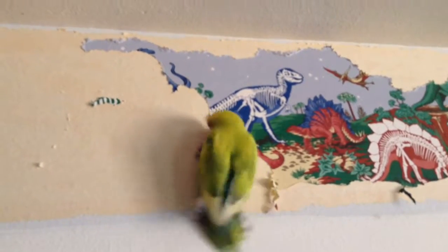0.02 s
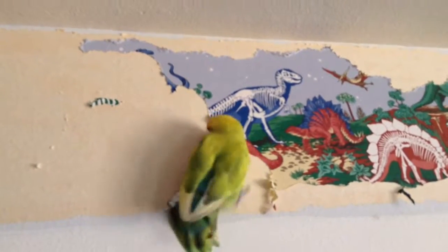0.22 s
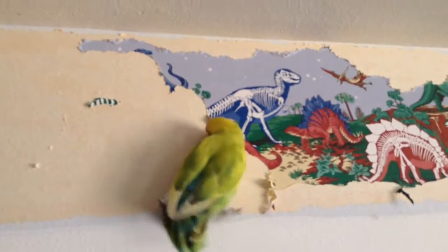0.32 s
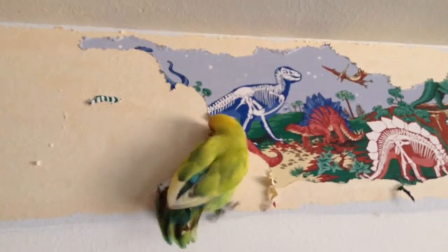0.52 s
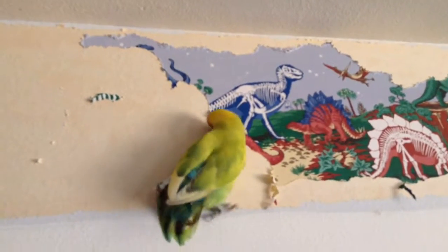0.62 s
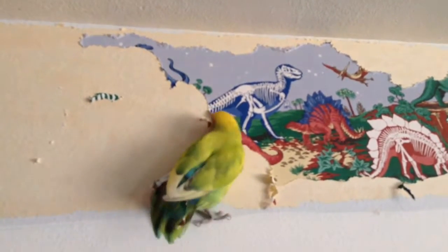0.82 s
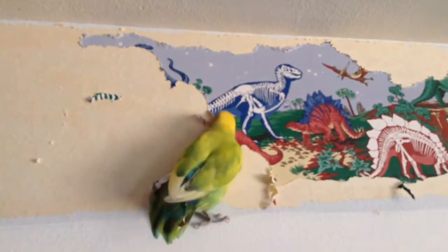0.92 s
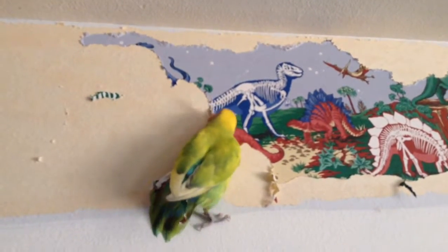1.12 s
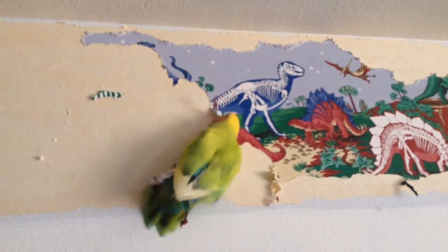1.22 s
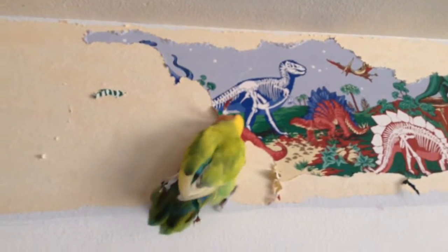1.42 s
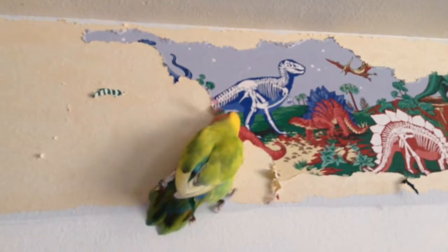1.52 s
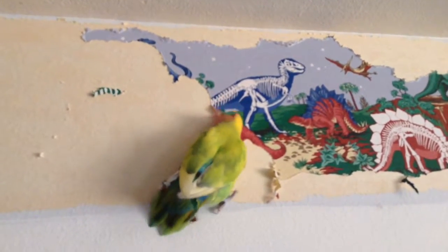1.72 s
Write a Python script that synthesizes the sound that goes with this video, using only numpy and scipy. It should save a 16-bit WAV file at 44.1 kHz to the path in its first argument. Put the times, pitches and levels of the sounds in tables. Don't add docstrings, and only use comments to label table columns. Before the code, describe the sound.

A small parrot chatters a rapid string of shrill, raspy chirps, then flutters its wings softly indoors.

```python
import sys
import numpy as np
from scipy import signal
from scipy.fft import rfft, irfft
from scipy.io import wavfile
from scipy.ndimage import uniform_filter1d, minimum_filter1d

SR = 44100
rng = np.random.default_rng(int(sys.argv[2]) if len(sys.argv) > 2 else 0)


def master(y):
    cut = np.clip(np.atleast_2d(y).T, -1, 1)
    pcm = np.round(cut * 32767)
    wavfile.write(sys.argv[1], SR, pcm.astype(np.int16))


def natural_amplitude(level_db):
    exponent = np.asarray(level_db, float) / 20
    return 10 ** exponent


N = 79380
LEAD = 8820

# frequency_hz, level_db per Hz
HOUSE_HISS = [(40, -27), (90, -7.5), (170, 5), (290, -14), (1000, -13.5), (3000, -10), (6000, -20),
              (15500, -23)]
RUMBLE_HZ = (122.6, 156.8)
RUMBLE_DB = (-65, -67)
# start_s, level_db, pitch_hz
BUMPS = [
    (0.741, -45, 249),
    (1.084, -53.5, 165.8),
    (1.226, -50.5, 221.6),
    (1.781, -51, 170),
]
# start_s, length_s, level_db
RUSTLES = [
    (1.171, 0.026, -62),
    (1.213, 0.0071, -51),
    (1.215, 0.056, -61),
]
# frequency_hz, level_db
PAPER = [(1200, -15), (2000, -8), (5000, -34), (7500, 8), (9500, 8), (11500, -6.5), (13700, 7),
         (15500, -13.5)]
# frequency_hz, level_db, t60_s
TICK_MODES = [(1726, 0, 0.006), (2800, -6.5, .004), (4140, -2, 0.005), (8050, -1, 0.005), (9350, -2, 0.004),
              (13030, -8, 0.004)]
# start_s, level_db, swish_db (against the puff)
BEATS = [(0.744, -53, 26), (0.808, -51, 10), (0.872, -51, -2), (0.928, -39.5, -21), (0.989, -56, -4),
         (1.05, -43, -14.5), (1.123, -42.5, -13), (1.183, -47.5, 1), (1.233, -44.5, -13),
         (1.291, -38.5, -14), (1.351, -44.5, -9), (1.409, -42.5, -10), (1.47, -37.5, -17),
         (1.529, -52, -4.5), (1.587, -48.5, -11.5), (1.649, -49.5, -5), (1.71, -50, -1), (1.773, -48, -5)]
# frequency_hz, level_db
SWISH = [(300, -10.5), (700, 4.5), (1200, 6), (2000, -2.5), (4000, -1), (5500, -11), (9000, -19)]

# start_s, pitch_hz, level_db, half_pitch_db (share), roughness (0-1)
EARLIER = [(-.09, 3312, -35.5, 22.5, 0.42), (-.05, 3141, -29, 3, 0.44), (-.02, 3185, -41.5, 13, 0.3)]
RISE = [(0.173, 2894, -36, -45, .1), (0.184, 2800, -27, -45, 0.081), (0.213, 3089, -26.5, -50, .05),
        (0.249, 3231, -17.5, -57, .04), (0.26, 3534, -16.5, -47, .1)]
RASP = [(.251, 3500, -30, -35, .1), (.257, 4150, -26, -30, .3), (.267, 4150, -24, -6, .4),
        (.292, 4150, -24, -6, .5), (.306, 4200, -27, -6, .5), (.311, 3745, -15, -14, .15),
        (.318, 3600, -24, -10, .4), (.328, 3410, -20, -12, .3), (.358, 3470, -27, -12, .3)]
PEEP = [(0.376, 3520, -33, 0.5, .6), (0.393, 4024, -24.5, -10.5, 0.49), (0.397, 4178, -15, -30, 0.14),
        (0.409, 4290, -15, -49.5, .06), (0.424, 4267, -13.5, -53.5, .05), (0.425, 4173, -26, -50, .05),
        (0.432, 4250, -13.5, -46.5, 0.41), (.446, 4220, -29, -39.5, 0.38), (.472, 4140, -18.5, -38, 0.46)]
LOW = [(0.43, 2950, -27, -45, 0.15), (.437, 2950, -29.5, -45, 0.15), (.441, 3330, -22, -45, 0.14),
       (.45, 3100, -22, -45, .14), (0.465, 3250, -22, -40, 0.3), (0.472, 2940, -16, -45, 0.1),
       (0.497, 2960, -16, -45, 0.1), (.51, 3020, -15, -45, .1), (0.532, 3090, -16, -45, 0.12)]
SHRIEK = [(.521, 3720, -16, -40, .05), (.529, 3797, -5, -40, .01), (.549, 3797, -3, -40, .01),
          (.553, 3800, -26, -20, .25), (.572, 3790, -24, -14, .25), (.575, 3800, -16, -20, .1),
          (.594, 3780, -15, -14, .16), (.602, 4070, -8, -30, .02), (.618, 4075, -5, -30, .02)]
CROAK = [(0.621, 4060, -17, -20, 0.25), (.63, 4040, -14, -20, 0.3), (.636, 4020, -24, -16, .4),
         (.65, 4000, -20, -16, 0.3), (.655, 4050, -28, -16, .35), (0.664, 4050, -22, -16, 0.25),
         (.676, 4040, -22, -16, .3)]
SCREECH = [(0.683, 4144, -35.5, -9, 0.18), (0.685, 4420, -11, -14.5, 0.08),
           (0.689, 4290, -20.5, -9.5, 0.31), (0.694, 4440, -17, -3.5, 0.39), (0.702, 4366, -22, -0.5, 0.33),
           (0.708, 4390, -10.5, -3, 0.11), (0.719, 4440, -23.5, -7, 0.59)]
LAST = [(0.707, 4850, -17, -11, .25), (0.72, 5100, -19, -11, 0.3), (0.734, 5200, -16, -14, 0.35),
        (.745, 5260, -17, -16, 0.4)]
TWIN = [(0.718, 2930, -34, -26.5, 0.3), (.728, 2960, -31, -26, 0.3), (0.742, 3000, -32, -33, .3)]
HIGH_RASP = [(0.297, 5560, -27, -39, 0.13), (.308, 5590, -28, -39, 0.18), (0.315, 5690, -25, -39.5, .25),
             (0.324, 5700, -34.5, -38, 0.14), (0.359, 5570, -41, -36, 0.34)]
HIGH_CROAK = [(.619, 5855, -20, -36.5, 0.087), (.632, 5834, -24, -40, .1), (.638, 5750, -33.5, -39, 0.085),
              (.646, 6060, -25.5, -41, 0.12), (.66, 5680, -29, -37.5, .1), (.67, 5580, -37, -37.5, .1)]
CHIRPS = [EARLIER, RISE, RASP, PEEP, LOW, SHRIEK, CROAK, SCREECH, LAST, TWIN]
# partial_1_db, partial_2_db, partial_3_db, partial_4_db
OVERTONES_DB = [
    (0, 10.5, -2.5, 2),
    (0, -10, -13.5, -30.5),
    (0, -11.5, -19, -25.5),
    (0, -13, -21, -31.5),
    (0, -7.5, -13.5, -17),
    (0, -18.5, -27.5, -31),
    (0, -19, -23, -30.5),
    (0, -15, -3, -27.5),
    (0, -21.5, -20.5, -16),
    (0, 13, -2, -1.5),
]
LOWEST_DB = (-16.5, -12, -5, -2.5, -6.5, -9, 0.5, -17.5, 1.5, -5.5)
HIGH_DB = (0, -7, -80, -80)
HIGH_LOWEST_DB = (36.5, 25.5)
UPPER_HALVES_DB = (-16, -18)
# frequency_hz, level_db
BREATH = [(1900, -36), (2700, -8), (4000, 0), (6500, -4), (9000, -10), (12500, -13)]
# frequency_hz, level_db
BEAK = [(1000, -71.5), (1550, -21), (1800, -0.5), (12800, 7), (13600, -4), (14100, -11), (15600, -9.5)]
# frequency_hz, t60_s
ROOM_T60 = [(1500, 0.21), (2500, .36), (3200, 0.38), (5000, 0.31), (8000, 0.3), (13000, 0.2)]
# delay_s, level_db
ECHOES = [(.0031, -13.5), (.0057, -12.5), (.009, -17), (.0134, -17.5), (.019, -19), (.026, -18)]


def evened(x):
    return x / np.sqrt(np.mean(x ** 2) + 1e-20)


def read(points, hz):
    f, value = np.transpose(points)
    return np.interp(np.log(hz + 1), np.log(f + 1), value)


def noise(points, size=N):
    spectrum = rfft(rng.standard_normal(size))
    return evened(irfft(spectrum * natural_amplitude(read(points, np.fft.rfftfreq(size, 1 / SR))), size))


def drift(seconds, size):
    width = max(int(seconds * SR), 1)
    return evened(uniform_filter1d(uniform_filter1d(rng.standard_normal(size), width), width))


def resonate(x, hz, width):
    turn = np.exp(2j * np.pi * hz * np.arange(len(x)) / SR)
    r = np.exp(-np.pi * width / SR)
    return 2 * (turn * signal.lfilter([(1 - r) ** 2], [1, -2 * r, r * r], x / turn)).real


def hump(start, length):
    phase = np.clip((np.arange(N) / SR - start) / length, 0, 1)
    return np.sin(np.pi * phase ** .75) ** 2


def house():
    low = sum(natural_amplitude(db) * evened(resonate(rng.standard_normal(N), hz, 25.0))
              for hz, db in zip(RUMBLE_HZ, RUMBLE_DB))
    return natural_amplitude(-61.5) * noise(HOUSE_HISS) + low


def furniture_bumps():
    t = np.arange(N) / SR
    attack_s, t60 = 0.0013, .2
    bumps = 0
    for s, db, hz in BUMPS:
        envelope = natural_amplitude(db - 60 * np.maximum(t - s, 0) / t60) * np.clip((t - s) / attack_s, 0, 1)
        bumps = bumps + envelope * evened(resonate(rng.standard_normal(N), hz, 90.))
    return bumps


def paper_rustles():
    return noise(PAPER) * sum(natural_amplitude(db) * hump(s, length) for s, length, db in RUSTLES)


def beak_tick():
    tick_s, tick_db = 1.7447, -46
    after = np.maximum(np.arange(N) / SR - tick_s, 0)
    return sum(natural_amplitude(tick_db + db - 60 * after / t60) * np.sin(2 * np.pi * hz * after)
               for hz, db, t60 in TICK_MODES)


def wings():
    early_s, beat_s = 0.003, 0.042
    cup_hz, cup_width_hz, cup_db, swish_db = 603, 108, -8.5, -2
    cup = swish = 0
    for s, db, rel in BEATS:
        down = hump(s - early_s, beat_s)
        up = hump(s - early_s, 2.2 * beat_s)
        cup = cup + natural_amplitude(db + cup_db) * (down + .5 * up)
        swish = swish + natural_amplitude(db + min(rel, -6) + swish_db) * (down + 0.89 * up)
    grain = natural_amplitude(3.5 * np.tanh(drift(.003, N)))
    puffs = cup * evened(resonate(rng.standard_normal(N), cup_hz, cup_width_hz))
    return puffs + swish * grain * noise(SWISH)


def reflections():
    tail_db = -8.5
    taps = np.zeros(SR // 2)
    at = np.arange(200, len(taps) - 20, 20)
    taps[at + rng.integers(0, 20, len(at))] = rng.choice([-1., 1.], len(at))
    hz, t, z = signal.stft(taps, SR, nperseg=256)
    decay = natural_amplitude(-60 * t / read(ROOM_T60, hz)[:, None])
    tail = signal.istft(z * decay, SR, nperseg=256)[1]
    tail = natural_amplitude(tail_db) * tail / np.linalg.norm(tail)
    for s, db in ECHOES:
        tail[round(s * SR) + rng.integers(0, 12)] += rng.choice([-1., 1.]) * natural_amplitude(db)
    return tail


def room(x):
    head_turn_s = .012
    paths = np.array([drift(head_turn_s, len(x)) for _ in range(3)])
    paths /= np.linalg.norm(paths, axis=0)
    wet = sum(signal.fftconvolve(x * path, reflections()) for path in paths)
    return wet + np.pad(x, (0, len(wet) - len(x)))


def chirp(rows, overtones_db, lowest_db):
    wobble, tremble = .04, 0.0056
    patchy_db, hiss_db, edge_s = 7, 0, .003
    blur, half_blur = .12, 1.4

    t = (np.arange(SR) - LEAD) / SR
    s, hz, level_db, half_db, rough = np.transpose(rows)
    rough = np.clip(np.interp(t, s, rough), 0, 1)
    half_db = np.interp(t, s, half_db)
    waver = wobble * rough * (drift(.0012, SR) + drift(0.0037, SR)) + tremble * drift(0.0022, SR)
    turn = 2 * np.pi * np.cumsum(np.interp(t, s, hz) * (1 + waver)) / SR

    lines = [(k + 1, db) for k, db in enumerate(overtones_db)]
    lines += [(k + .5, db + half_db) for k, db in enumerate((lowest_db, 0, *UPPER_HALVES_DB))]
    tone = 0
    for k, db in lines:
        level = natural_amplitude(db + patchy_db * np.sqrt(rough) * np.tanh(drift(.004, SR)))
        wander = (blur * abs(k * k - 1) + half_blur * (k % 1)) * drift(.0015, SR)
        tone = tone + level * np.cos(k * turn + k * k + wander)
    tone = tone + natural_amplitude(hiss_db) * rough ** 2 * noise(BREATH, SR)

    shake = 1 - rough + 1.8 * rough * np.tanh(drift(.0007, SR))
    gate = np.clip(np.minimum(t - s[0], s[-1] - t) / edge_s + 1, 0, 1)
    loudness = uniform_filter1d(gate * natural_amplitude(np.interp(t, s, level_db)), size=89)
    return loudness * shake * tone


def parrot():
    calls = CHIRPS + [HIGH_RASP, HIGH_CROAK]
    overtones = OVERTONES_DB + 2 * [HIGH_DB]
    voice = sum(chirp(*call) for call in zip(calls, overtones, LOWEST_DB + HIGH_LOWEST_DB))
    return irfft(rfft(voice) * natural_amplitude(read(BEAK, np.fft.rfftfreq(SR, 1 / SR))), SR)


def scene():
    bird = np.pad(room(parrot())[LEAD:], (0, N))[:N]
    flaps = wings()
    flutter = .4 * flaps + .4 * room(flaps)[:N]
    near = furniture_bumps() + beak_tick() + paper_rustles()
    return (bird + flutter + near + house())[None]


def top_cut(x):
    return signal.sosfilt(signal.butter(12, 15690, fs=SR, output="sos"), x)


def record(dry):
    edge_hz, mic_low_hz = 15750, 59.6
    ceiling, hold = .95, 301
    low_pass = signal.firwin(511, edge_hz, window=("kaiser", 9), fs=SR)
    x = signal.oaconvolve(dry, low_pass[None], "same")
    x = signal.sosfilt(signal.butter(2, mic_low_hz, "high", fs=SR, output="sos"), x)
    gain = minimum_filter1d(np.minimum(ceiling / (abs(x) + 1e-9), 1), hold)
    mix = x * uniform_filter1d(gain, hold // 2)
    return top_cut(mix)


dry = scene()
out = record(dry)
master(out)
```